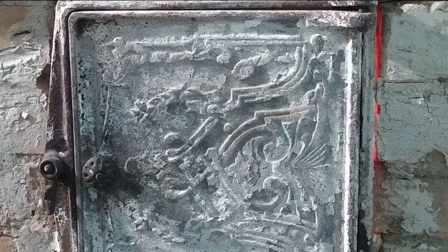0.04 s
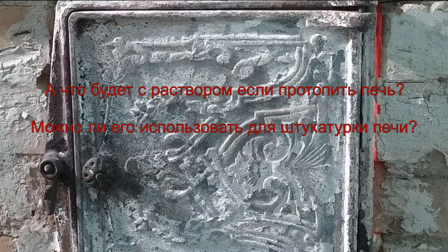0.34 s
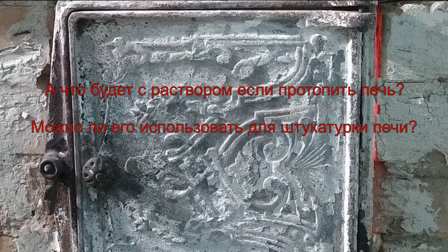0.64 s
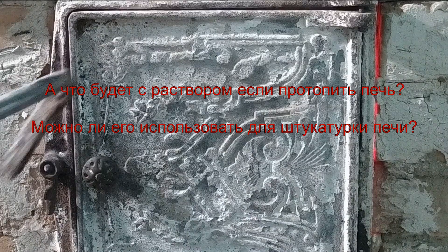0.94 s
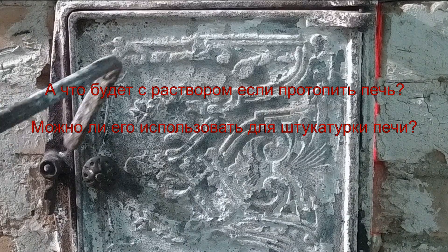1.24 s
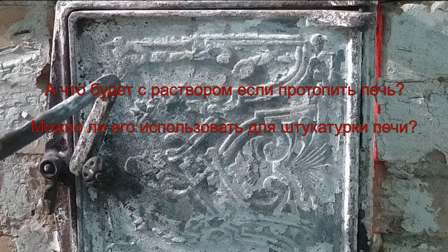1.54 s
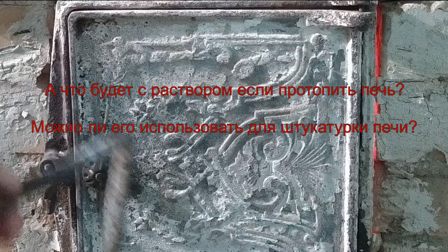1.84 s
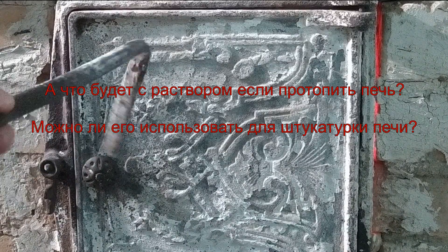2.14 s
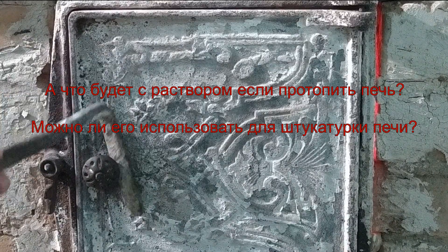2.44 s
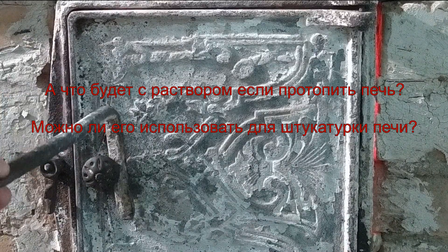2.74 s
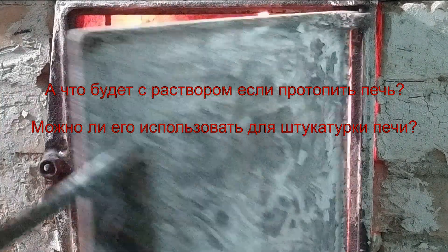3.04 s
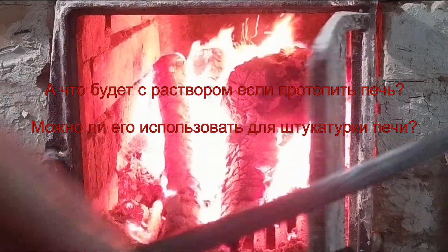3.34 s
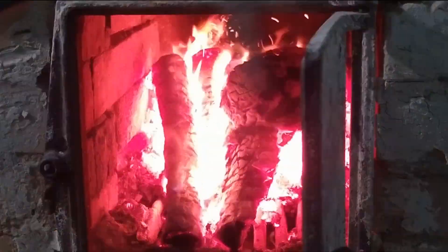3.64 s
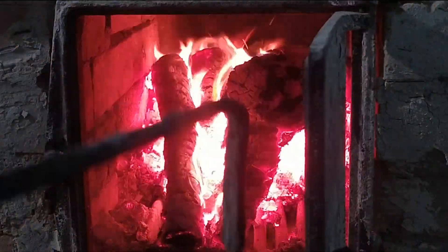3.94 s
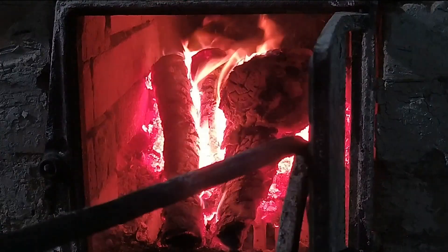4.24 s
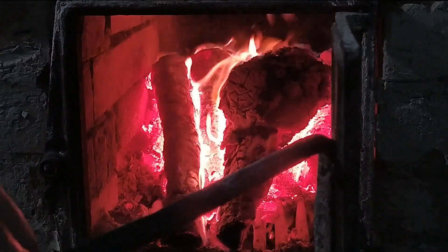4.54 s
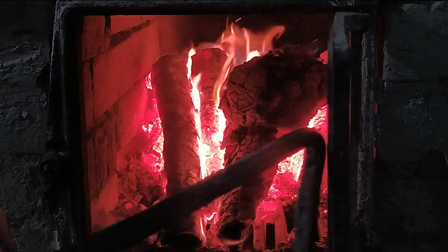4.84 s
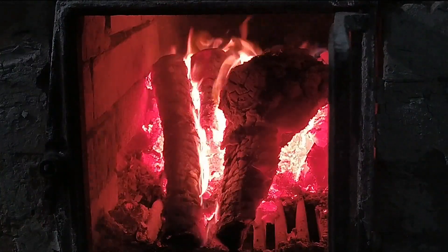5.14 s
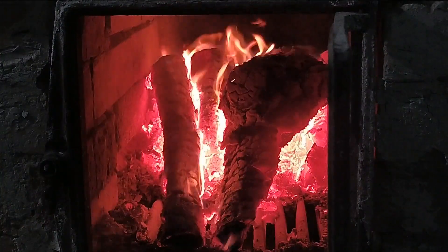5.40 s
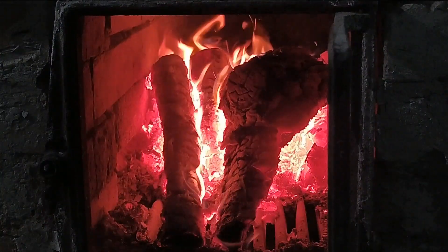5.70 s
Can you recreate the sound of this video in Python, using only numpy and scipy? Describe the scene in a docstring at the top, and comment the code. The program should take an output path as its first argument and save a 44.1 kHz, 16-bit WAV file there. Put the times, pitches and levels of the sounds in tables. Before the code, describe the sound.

A wood fire rumbles and hisses quietly in a cast-iron stove, with a low, fluttering hum from the flue, heard up close in a small, hard-walled room. From about 0.8 seconds a steel poker feels for the latch with light taps, clinks and short gritty scrapes, busier between 1.5 and 2 seconds. A firm clank at 2.6 seconds knocks the latch up. Near 3.2 seconds the door swings open on a briefly singing hinge, and the hum sinks. Loud, ringing metal blows land at about 3.3, 3.7 and 4.3 seconds, the first two with a quick rattle. From 4.5 seconds the poker drags along the door's edge, clanks twice around 4.7 seconds and settles with a tiny, thin squeak. The logs, which have snapped only now and then, crackle softly and more often until the end, near 6 seconds.

```python
"""A fire hisses in a cast-iron stove and the draught hums in the flue. From 0.8 s a steel poker feels for
the latch and knocks it up: each impact excites the modes of door, poker, latch and a small hard room,
and between impacts sliding friction scrapes. Near 3.2 s the door swings open on a singing hinge, heavy
blows follow and the hum sinks. From 4.5 s the poker drags along the door's edge and comes to rest with
a thin squeak. The logs, which have snapped now and then, snap more often towards the end."""
import sys
import numpy as np
from scipy import signal
from scipy.fft import rfft, irfft, next_fast_len
from scipy.io import wavfile
from scipy.ndimage import uniform_filter1d

SR = 44100
rng = np.random.default_rng(int(sys.argv[2]) if len(sys.argv) > 2 else 0)


def store_pcm(level_fs):
    """Save levels as 16-bit WAV."""
    pcm = np.round(np.clip(level_fs, -1, 1) * 32767).astype(np.int16)
    wavfile.write(sys.argv[1], SR, np.atleast_2d(pcm).T)


N = 263051
RING_T = np.arange(int(.7 * SR)) / SR  # time axis of one ring, t/s
QUADRATURE = np.array([[0], [1 / 4]])  # left and right phase/cycles


# Impacts of the poker: t/s, contact time/s, knock level/dB, clank level/dB, clank f/Hz, tick level/dB,
# door level/dB, poker level/dB, latch level/dB, left minus right/dB
BLOWS = [(0.779, 0.0067, -58, -78, 3000, -59, -8, -24, -20, -1),
         (0.803, 0.00052, -43, -55.5, 3000, -60, -31, -29, -49, 0.5),
         (1.063, 0.0036, -52, -78, 2600, -47.5, -47, -18, -49, 0.5),
         (1.533, 0.012, -52, -79, 1550, -70, -31, 0, -25, 0),
         (1.554, 0.00074, -46.5, -48.5, 3600, -59, -25, -21, -10, 1.5),
         (1.597, 0.047, -49, -80, 1000, -90, -52, -10, -41, -1),
         (1.631, 0.002, -69, -57, 2670, -79, -29, -17, -7, -1),
         (1.866, 0.0013, -57, -47, 2700, -60.5, -15, -16, -26, 1),
         (1.909, 0.0025, -42, -43, 2700, -52, 3, -36, 7, 1.5),
         (1.948, 0.0031, -51, -68, 2700, -52, -30, -21, -38, -1.5),
         (2.32, 0.0022, -59.5, -54.5, 2240, -55.5, -8, -44, -36, 0),
         (2.389, 0.0011, -49.5, -50, 2010, -51.5, -43, -25, -38, -0.5),
         (2.5796, 0.0019, -25, -23.5, 1130, -48, -32, -3.5, 2.5, 0),
         (2.802, 0.0026, -59.5, -61.5, 2130, -73.5, -9, -22, -21, 0),
         (2.939, 0.0028, -60, -78, 2200, -66.5, -19, -26, -43, 3),
         (3.075, 0.011, -54.5, -45.5, 3230, -48.5, -12, -19, -38, 0.5),
         (3.3189, 0.0002, -17.5, -25, 2950, -43.5, -16, -18.5, -20, -0.5),
         (3.7135, 0.025, -40, -19, 2512, -23.5, 7, -13.5, -29.5, -1),
         (4.311, 0.0083, -36, -28.5, 2700, -49.5, 2, 7, -9, 2.5),
         (4.455, 0.0025, -76, -58, 2180, -56, -14.5, -17, -14, 4),
         (4.656, 0.0048, -69.5, -52, 2420, -55.5, 10, -16, 0, 1),
         (4.732, 0.0049, -39.5, -32, 1640, -78, -16, -36, 6.5, 2.5)]

def blows(door, poker, latch, gain_db=-1, smack_db=-10):
    """Impact excitation: the place and hardness of a blow set the spectrum of the modes it wakes."""
    thickets = [casting() for _ in range(5)]
    out = np.zeros((2, N))
    for start, contact, *timbre, door_db, poker_db, latch_db, pan_db in BLOWS:
        metal = thickets[rng.integers(len(thickets))]
        metal = metal + amp(door_db) * door + amp(poker_db) * poker + amp(latch_db) * latch
        humps = broadened([(DOOR_MODES, door_db), (POKER_MODES, poker_db), (LATCH_MODES, latch_db)])
        burst = clatter(contact, direct=.83, direct_t60=.098, humps=humps)
        smack = pair_noise(len(RING_T)) * decay(min(contact, .0032), t60=.035)  # first touch, dry
        body = swell(burst + amp(smack_db) * smack + swell(metal, contact / 2), rise_s=.057 * contact)
        pan = amp([[pan_db / 2], [-pan_db / 2]])
        add(out, start, pan * colour(body, blow_spectrum(*timbre)))
    return amp(gain_db) * out


# Spectra of the three parts of a blow: f/Hz, level/dB
KNOCK = [(70, -20.5), (260, -7.5), (480, 0.5), (800, -3.5), (1100, -9), (2200, -18), (4300, -18.5),
         (8800, -31.5), (16000, -67)]
CLANK = [(70, -16.5), (500, -19), (1100, -12), (1700, -3.5), (2200, -3.5), (2900, -8), (4300, -12.5),
         (8800, -27.5), (16000, -56)]
TICK = [(70, -42.5), (500, -28.5), (2200, -22), (4300, -12), (8800, 0), (11000, -4), (12300, -24),
        (14300, -19.5), (16000, -32.5)]

def blow_spectrum(knock_db, clank_db, clank_hz, tick_db):
    """Powers add: the mass behind a blow knocks, the struck spot clanks, a sharp edge ticks."""
    hz = np.geomspace(70, 16000, 128)
    clank = clank_db + read(CLANK, hz * 2200 / clank_hz)  # slides with the spot that is struck
    parts = amp([knock_db + read(KNOCK, hz), clank, tick_db + read(TICK, hz)])
    return np.c_[hz, 10 * np.log10((parts ** 2).sum(0))]


# Normal modes of the metal parts: f/Hz, level/dB, T60/s
DOOR_MODES = [(1101, -17, 0.31), (1203, -15, 0.3), (1693, -23, 0.16), (1898, -26, 0.22), (2312, -15, 0.16),
              (2721, -21, 0.17), (2947, -24, 0.17), (3098, -25, 0.2), (3499, -27, 0.13), (4215, -19, 0.18),
              (4600, -22, 0.15), (5130, -25, 0.16), (5362, -22, 0.18), (5712, -25, 0.1), (6027, -16, 0.15),
              (6790, -22, 0.2), (7308, -23, 0.2), (7550, -24, 0.17), (7835, -20, 0.15), (8091, -22, 0.18),
              (8498, -17, 0.19), (8753, -18, 0.13), (8944, -19, 0.16), (9545, -21.5, 0.2),
              (10630, -27, 0.17), (13986, -19, 0.22)]
POKER_MODES = [(1384, -21, .14), (1906, -19, .17), (2414, -28, .17), (2721, -26, .13), (3666, -7, .15),
               (3733, -14, .11), (4229, -12, .13), (4330, -16, .09), (5900, -13, .14), (8759, -18, .2),
               (9830, -16, .17)]
LATCH_MODES = [(493, -22, 0.17), (1175, -15, 0.13), (2030, -21, 0.13), (2400, -18, 0.15), (2815, -16, 0.19),
               (3085, -21, 0.13), (3650, -21, 0.1), (4240, -21, 0.14), (4510, -18, 0.14), (5330, -19, 0.14),
               (6100, -22, 0.12), (7310, -20, 0.13), (8780, -17, 0.12)]

def metal_parts():
    """Free vibration: door, poker and latch each ring at their own natural frequencies."""
    return ring(DOOR_MODES), ring(POKER_MODES), ring(LATCH_MODES)


def casting(db=-22, spread_db=4, t60=.15, count=60):
    """Irregular geometry: the relief of the casting adds a thicket of weak, unevenly spaced modes."""
    place, size, life = rng.random((count, 3)).T
    hz = 1400 + 10500 * ((np.arange(count) + place) / count) ** 1.3
    return ring(np.c_[hz, db + spread_db * (2 * size - 1), t60 * (.7 + .6 * life)])


def ring(modes, scatter_db=1.5):
    """Modal superposition: damped sinusoids, each a quarter cycle apart in the two channels."""
    out = np.zeros((2, len(RING_T)))
    for hz, db, t60 in modes:
        phase = rng.random() + rng.choice([-1, 1]) * QUADRATURE
        tone = np.sqrt(2) * np.sin(2 * np.pi * (hz * RING_T + phase))
        out += amp(db + scatter_db * rng.standard_normal((2, 1))) * tone * decay(1 / SR, t60)
    return out


def broadened(parts, width_hz=130, span_hz=1500, valley=.06, spot_db=5):
    """Resonance broadening: the modes of parts in contact widen into humps; a gain per frequency."""
    hz = np.fft.rfftfreq(len(RING_T), 1 / SR)
    # the spot that is touched favours some modes over others
    peaks = [(f, amp(db + part_db + spot_db * rng.standard_normal()))
             for modes, part_db in parts for f, db, _ in modes]
    power = sum(height / (1 + (2 * (hz - f) / width_hz) ** 2) ** 2 for f, height in peaks)
    evened = power / uniform_filter1d(power, int(span_hz / hz[1]))  # removes the broad slope
    return np.sqrt(np.where((hz < 900) | (hz > 10300), 1, valley + evened))


# Low modes of the door in its frame: t/s, f/Hz, level/dB, T60/s
THUDS = [(0.803, 400, -28, 0.045), (0.804, 175, -34, 0.12), (1.536, 676, -37, 0.035),
         (1.592, 161.6, -31, 0.19), (1.607, 427, -34, 0.059), (2.578, 171.5, -28.5, 0.13),
         (2.757, 226, -36.5, 0.083), (3.32, 170, -26.5, 0.19), (3.32, 490, -26, 0.09),
         (3.32, 845, -23, 0.12), (3.712, 29, -34, 0.35), (3.724, 148, -34, 0.15), (4.34, 264, -39, 0.14),
         (4.361, 102.7, -42.5, 0.45)]

def thuds():
    """Piston radiation: the door, rocked in its frame, gives the air a low, dull push."""
    return notes(THUDS, rise_s=.0049)


# Single modes of hook, latch or door: t/s, f/Hz, level/dB, T60/s
TINKS = [(1.29, 2100, -60, 0.12), (1.554, 2798, -40, 0.14), (1.634, 2230, -50.5, 0.14),
         (1.867, 2500, -28, 0.033), (1.867, 2820, -44, 0.26), (1.868, 6780, -44.5, 0.11),
         (1.911, 1954, -38, 0.16), (1.911, 2738, -38.5, 0.22), (1.911, 4506, -33, 0.077),
         (2.324, 2046, -49, 0.14), (3.099, 1557, -39, 0.065), (4.733, 1217, -32, 0.25),
         (4.733, 1712, -29.5, 0.18), (4.732, 2283, -18, 0.033)]

def tinks():
    """Selective excitation: contacts of the hook pick out single notes of the iron."""
    return notes(TINKS, rise_s=.00062)


# After-ring of door and poker: t/s, f/Hz, level/dB, T60/s
TOLLS = [(3.32, 1203, -23, 0.31), (3.78, 1203, -22, 0.47), (4.335, 1909, -14, 0.19)]

def tolls():
    """Mode coupling: after a heavy blow, energy passes slowly to one mode, which swells and fades."""
    return notes(TOLLS, rise_s=.09, phase=QUADRATURE)


# Runs of bounces: t/s, first level/dB, loss per bounce/dB
RATTLES = [(1.918, -47, 9), (2.591, -47.5, 8), (3.345, -44, 3.5), (3.717, -33, 5.5), (4.742, -49, 2.5)]
# Spectrum of a bounce: f/Hz, level/dB
BOUNCE = [(150, -7.5), (500, -1), (1200, 0.5), (4600, -8.5), (9000, -15.5), (16000, -42)]

def rattles(gap_s=.009, uneven_db=2, count=8):
    """Inelastic collisions: after a heavy blow the loose iron bounces in quick, weakening cracks."""
    out = np.zeros((2, N))
    cracks = [colour(clatter(contact=.0003, direct=.7, direct_t60=.015), BOUNCE) for _ in range(4)]
    for start, db, loss_db in RATTLES:
        gaps = gap_s * (.5 + rng.random(count))
        for k, delay in enumerate(np.cumsum(gaps) - gaps[0]):
            gain = amp(db - k * loss_db + uneven_db * rng.standard_normal())
            add(out, start + delay, gain * cracks[k % len(cracks)])
    return out


# Strokes of steel on iron: t/s, rise/s, hold/s, grinding level/dB, grit level/dB
STROKES = [(0.758, 0.032, 0.075, -54.5, -43), (1.041, 0.017, 0.023, -60.5, -43.5),
           (1.213, 0.08, 0.015, -59.5, -63.5), (1.734, 0.017, 0.01, -58.5, -56),
           (1.759, 0.14, 0.0051, -41.5, -49), (1.97, 0.034, 0.078, -92, -53.5),
           (2.243, 0.02, 0.005, -59.5, -58), (2.622, 0.071, 0.0063, -48.5, -50.5),
           (2.866, 0.1, 0.029, -51.5, -57), (3.05, 0.04, 0.019, -42.5, -42),
           (3.154, 0.046, 0.073, -54.5, -51.5), (4.343, 0.016, 0.043, -51, -50.5),
           (4.408, 0.044, 0.17, -58, -47), (4.64, 0.065, 0.009, -39, -38.5),
           (4.842, 0.067, 0.0054, -49, -44), (5.236, 0.037, 0.036, -64, -60)]
# Spectra of grinding and of grit: f/Hz, level/dB
GRIND = [(100, -16), (450, 3.5), (800, 5), (1200, -2.5), (2300, 0.5), (3400, -7), (5500, -8), (9000, -18.5),
         (12000, -27), (16000, -37.5)]
GRIT = [(500, -23), (3000, -5.5), (6000, -5.5), (9000, 2.5), (11000, 0.5), (12500, -11.5), (16000, -20)]

def scrapes(poker, latch, damping_t60=.3, spots=3):
    """Sliding friction on rough iron: coarse slips ring the metal, fine grit mostly hisses."""
    damping = amp(-60 * RING_T / damping_t60)  # metal pressed on metal cannot ring for long
    metal = casting() + damping * (amp(-18.5) * poker + amp(-7.5) * latch)
    grinding = impulses(per_s=2200, spread_db=6.5)
    gritting = amp(-2) * impulses(per_s=7300, spread_db=11)
    out = np.zeros((2, N))
    for spot in range(spots):  # strokes take turns on spots with their own resonances
        coarse, fine = sum(amp(levels_db)[:, None] * pressure(start, rise, hold)
                           for start, rise, hold, *levels_db in STROKES[spot::spots])
        humps = broadened([(DOOR_MODES, 0), (POKER_MODES, -7), (LATCH_MODES, 2)])
        iron = colour(clatter(contact=.0017, direct=.9, humps=humps) + amp(-1) * metal, GRIND)
        grit = colour(clatter(contact=.001, direct=.89, humps=humps) + amp(-5) * metal, GRIT)
        out += driven(iron, grinding * coarse) + driven(grit, gritting * fine)
    return out


def pressure(start, rise, hold, power=2.1, lift_db_per_s=243.5):
    """Contact load of a stroke: it grows as a power of time, holds, then falls exponentially."""
    out = np.zeros((1, N))
    press = np.clip(RING_T / rise, 0, 1) ** power
    lift = amp(-lift_db_per_s * np.maximum(RING_T - rise - hold, 0))
    add(out, start, (press * lift)[None])
    return out


# Modes of the poker pressed on the door's edge: f/Hz, level/dB
EDGE_MODES = [(1100, -6), (1195, -7), (1720, -6), (2350, -6), (3670, -2), (4270, -12), (5400, -8),
              (5930, -4), (6150, -10), (6550, -11), (8490, -9), (8760, -9), (9830, -9), (12200, -19),
              (14100, -19)]
# Strength of the drag along that edge: t/s, level/dB
DRAG = [(4.47, -57), (4.58, -54), (4.64, -49), (4.68, -39.5), (4.71, -32.5), (4.735, -32.5), (4.755, -55),
        (4.87, -75), (4.925, -50), (4.99, -68)]

def drag(t60=.06):
    """Stick-slip excitation: the dragged poker keeps the modes it shares with the door ringing."""
    body = ring([(hz, db, t60) for hz, db in EDGE_MODES])
    return driven(body, impulses(per_s=1000, spread_db=2) * level(DRAG))


# Singing of the swinging door: t/s, level/dB
HINGE = [(3.15, -63), (3.21, -54), (3.245, -39), (3.27, -46), (3.32, -61.5)]

def hinge(hz=1203, waver=.2):
    """Friction-driven oscillation: the hinge feeds one long-lived mode of the door."""
    tone = np.sqrt(2) * np.sin(2 * np.pi * (hz * np.arange(N) / SR + QUADRATURE))
    return level(HINGE) * (tone + waver * narrow_noise(hz, width_hz=380))


# Squeak as the poker comes to rest: t/s, duration/s, first f/Hz, last f/Hz, level/dB
SQUEAK = (4.853, 0.026, 5300, 4600, -55.5)

def squeak(width_hz=250):
    """Rapid stick-slip: the steel gives a rough falling note and its octave."""
    start, duration, first_hz, last_hz, db = SQUEAK
    hz = np.linspace(first_hz, last_hz, int(duration * SR))
    jitter = np.sqrt(width_hz * SR / (2 * np.pi)) * rng.standard_normal(len(hz))
    phase = 2 * np.pi * np.cumsum(hz + jitter) / SR
    tone = np.sin(phase) + np.sin(2 * phase)
    out = np.zeros((2, N))
    add(out, start, (amp(db) * np.hanning(len(hz)) * tone)[None])
    return out


# Loudest snaps of the logs: t/s, level/dB, body offset/dB
SNAPS = [(0.747, -55, 1), (2.904, -64, 16), (3.674, -50.5, -15.5), (3.925, -55.5, 2), (4.776, -44.5, -1),
         (5.214, -54, -20), (5.269, -55, -3.5), (5.328, -52.5, -12), (5.462, -44, -34), (5.524, -57, 11.5),
         (5.806, -55.5, -30.5)]
# Spectra of a snap's crack and body: f/Hz, level/dB
CRACK = [(300, -20), (3000, -23.5), (6000, -7.5), (9500, 4), (12000, -2.5), (16000, -16.5)]
SNAP_BODY = [(200, -20), (1500, -12), (3000, -9), (5000, -9), (9000, -19.5)]

def snaps(crack_db=-14, body_db=-12, ticks_db=-75):
    """Sudden pressure release: gas pockets burst in the logs, a few loudly, many as faint ticks."""
    out = np.zeros((2, N))
    for start, db, offset_db in SNAPS:
        burst = swell(clatter(contact=.0015, direct=.8, direct_t60=.025), rise_s=.0002)
        crack = amp(crack_db) * colour(burst, CRACK)
        body = amp(body_db + offset_db) * colour(burst, SNAP_BODY)
        add(out, start, amp(db) * (crack + body))
    tick = colour(clatter(contact=.0005, direct=.46, direct_t60=.0074), CRACK)
    return out + amp(ticks_db) * unit(driven(tick, impulses(per_s=40, spread_db=4)))


# Spectral density of the fire's rumble and hiss: f/Hz, relative level/dB
FLAMES = [(12, -28), (20, 4.5), (70, 3), (107, -5.5), (177, -3.5), (228, -12), (500, -13.5), (680, -23),
          (1800, -30.5), (6360, -33.5), (9140, -26), (14700, -40), (16000, -49.5)]
# Hum of the flue, weaker once the door is open: t/s, level/dB
DRAUGHT = [(.2, -50), (1.0, -51.5), (2.3, -52), (3.202, -50.5), (3.601, -58.5), (4.301, -62), (5.2, -61),
           (5.9, -65.5)]

def fire(flames_db=-55.5):
    """Combustion noise and flue resonance: the flames' low middle and the hum flutter together."""
    noise = pair_noise(next_fast_len(N))[:, :N]
    flames = amp(flames_db) * unit(colour(noise, FLAMES, size=8192))
    licks = signal.sosfiltfilt(signal.butter(2, [110, 600], "bandpass", fs=SR, output="sos"), flames)
    draught = level(DRAUGHT + [(N / SR, DRAUGHT[-1][1])])  # holds its last level
    hum = draught * narrow_noise(hz=166.5, width_hz=38)
    return flames - licks + (licks + hum) * flutter(depth_db=1.7, below_hz=14)


def flutter(depth_db, below_hz):
    """Random amplitude modulation: a gain that wanders as the flames lick."""
    size = next_fast_len(N)
    spectrum = rfft(rng.standard_normal(size))
    slow = irfft(spectrum * (np.fft.rfftfreq(size, 1 / SR) < below_hz))[:N]
    return unit(amp(depth_db * unit(slow)))


# Reverberation time of the room: f/Hz, T60/s
ROOM = [(150, 0.53), (500, 0.14), (1200, 0.3), (2500, 0.26), (5000, 0.19), (10000, 0.23), (14000, 0.15)]

def clatter(contact, direct, direct_t60=.082, humps=1):
    """Modal overlap: countless modes merge into noise, a direct burst and the room's tail."""
    size = len(RING_T)
    hz = np.fft.rfftfreq(size, 1 / SR)
    burst = irfft(rfft(pair_noise(size)) * humps, size) * decay(contact, direct_t60)
    tail = rfft(pair_noise(size)) * humps
    centres, t60s = np.transpose(ROOM)
    bands = [irfft(tail * read(np.c_[centres, pick], hz), size) for pick in np.eye(len(ROOM))]
    room = sum(band * decay(contact, t60) for band, t60 in zip(bands, t60s))
    return np.sqrt(direct) * burst + np.sqrt(1 - direct) * room


# Likeness of left and right: f/Hz, correlation coefficient
COHERENCE = [(30, 0.79), (180, 0.99), (320, 0.6), (550, 0.64), (1000, 0.07)]

def pair_noise(length):
    """Spatial coherence: white noise at two points is alike in the bass, unrelated in the treble."""
    left, other = rfft(rng.standard_normal((2, length)))
    same = read(COHERENCE, np.fft.rfftfreq(length, 1 / SR))
    return irfft(np.array([left, same * left + np.sqrt(1 - same ** 2) * other]), length)


def narrow_noise(hz, width_hz):
    """Resonant filtering: noise in one steep band, rms 1."""
    size = next_fast_len(N)
    detuning = 2 * (np.fft.rfftfreq(size, 1 / SR) - hz) / width_hz
    return unit(irfft(rfft(pair_noise(size)) / (1 + detuning ** 2))[:, :N])


def impulses(per_s, spread_db):
    """Poisson process: tiny impacts of uneven size at random times, rms 1."""
    size = amp(spread_db * np.minimum(rng.exponential(1, N), 4)) * rng.choice([-1, 1], N)
    return unit(size * (rng.random(N) < per_s / SR))[None]


def driven(body, force):
    """Forced response: the force convolved with the body's impulse response, scaled to energy 1."""
    return signal.oaconvolve(force, unit(body) / np.sqrt(len(RING_T)), axes=1)[:, :N]


def notes(rows, rise_s, phase=0):
    """Damped oscillators, one to a row."""
    out = np.zeros((2, N))
    for start, hz, db, t60 in rows:
        tone = amp(db - 60 * RING_T / t60) * np.sin(2 * np.pi * (hz * RING_T + phase))
        add(out, start, np.atleast_2d(swell(tone, rise_s)))
    return out


def decay(contact, t60):
    """Energy balance: an envelope of energy 1, fed during contact, then dying freely."""
    tau = t60 / np.log(10 ** 6)
    fed = 1 - np.exp(-np.minimum(RING_T, contact) / tau)
    return np.sqrt(fed * np.exp(-np.maximum(RING_T - contact, 0) / tau) / contact)


def swell(sound, rise_s):
    """Onset transient: a vibration builds up with time constant rise_s."""
    return sound * (1 - np.exp(-RING_T / max(rise_s, 1 / SR)))


def colour(x, points, size=2048):
    """Causal filtering to a shape given as f/Hz, level/dB."""
    log_gain = np.log(amp(read(points, abs(np.fft.fftfreq(size, 1 / SR)))))
    taps = np.fft.ifft(np.exp(np.conj(signal.hilbert(log_gain)))).real
    return signal.oaconvolve(x, taps[None], axes=1)[:, :x.shape[1]]


def read(points, hz):
    """Interpolation on a log-frequency axis."""
    f, value = np.transpose(points)
    return np.interp(np.log(hz + 1), np.log(f + 1), value)


def level(curve):
    """Gain over time from t/s, level/dB; silent outside the curve."""
    times, db = np.transpose(curve)
    return amp(np.interp(np.arange(N) / SR, times, db, left=-np.inf, right=-np.inf))


def amp(db):
    return 10 ** (np.asarray(db) / 20)


def unit(x):
    """Scales to rms 1."""
    return x / np.sqrt(np.mean(x ** 2) + 1e-20)


def add(mix, start, sound):
    part = mix[:, round(start * SR):][:, :sound.shape[1]]
    part += sound[:, :part.shape[1]]


def scene():
    """Linear superposition of impacts, friction and fire."""
    door, poker, latch = metal_parts()
    struck = blows(door, poker, latch) + thuds() + tinks() + tolls() + rattles()
    rubbed = scrapes(poker, latch) + drag() + hinge() + squeak()
    return struck + rubbed + snaps() + fire()


def record(dry, start_s=.203, fade_s=.018, ceiling=.88, cutoff_hz=16100):
    """Clipping and band limiting: after a brief silence the sound fades in; top peaks just overload."""
    fade_in = np.clip((np.arange(N) / SR - start_s) / fade_s, 0, 1)
    clipped = np.clip(dry * fade_in, -ceiling, ceiling)
    taps = signal.firwin(511, cutoff_hz, window=("kaiser", 9), fs=SR)
    return signal.oaconvolve(clipped, taps[None], "same")


dry = scene()
out = record(dry)
store_pcm(out)
```